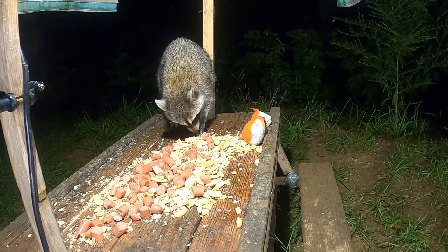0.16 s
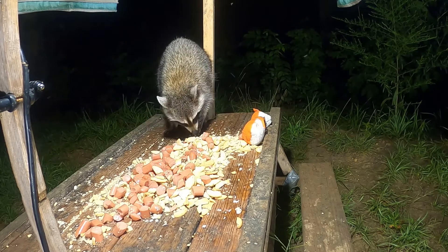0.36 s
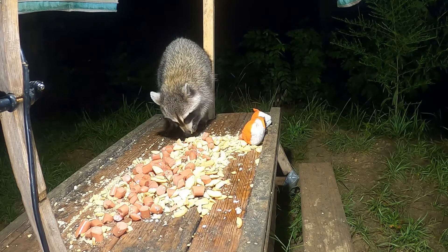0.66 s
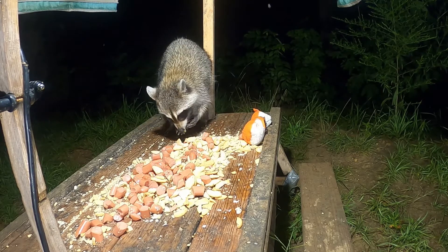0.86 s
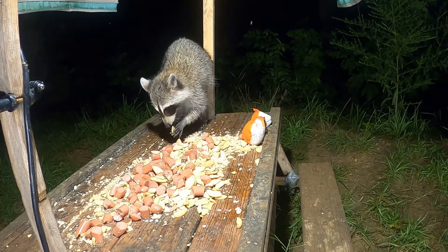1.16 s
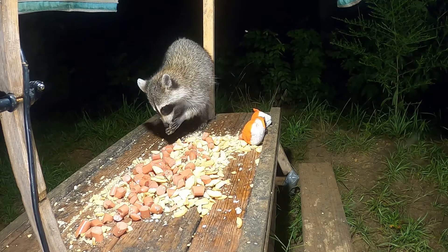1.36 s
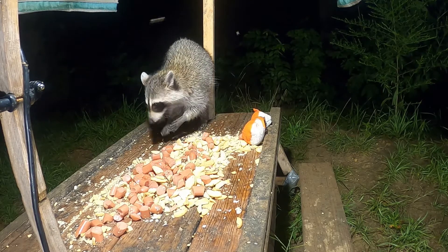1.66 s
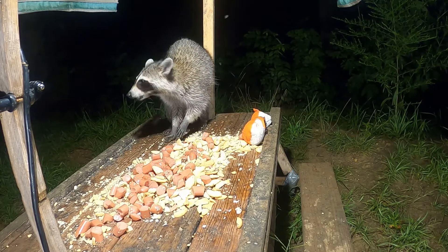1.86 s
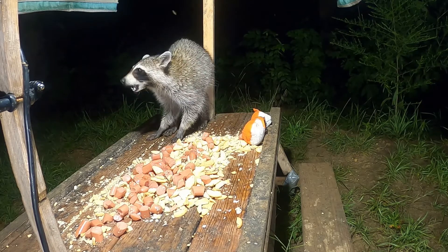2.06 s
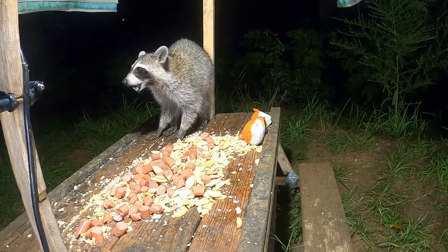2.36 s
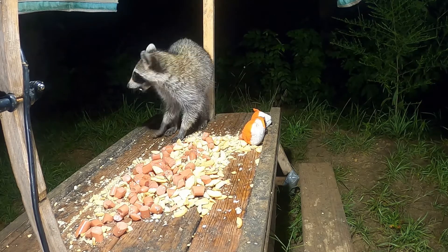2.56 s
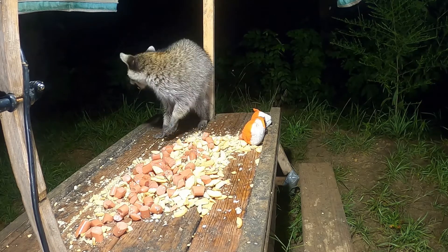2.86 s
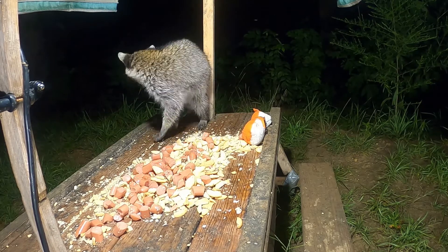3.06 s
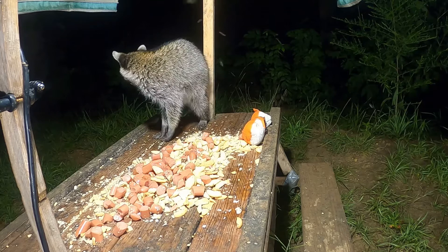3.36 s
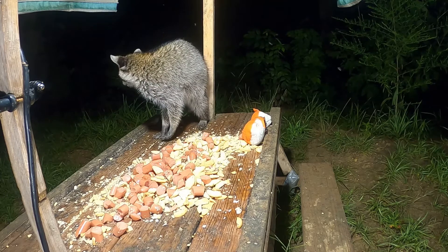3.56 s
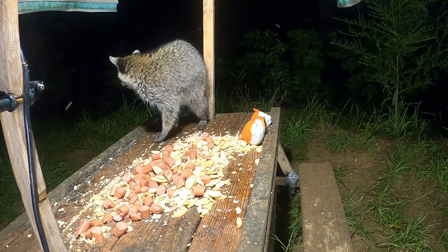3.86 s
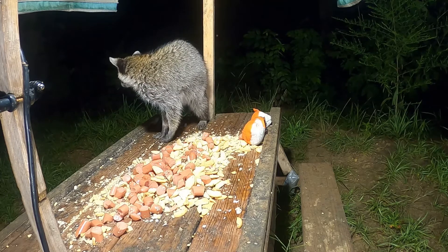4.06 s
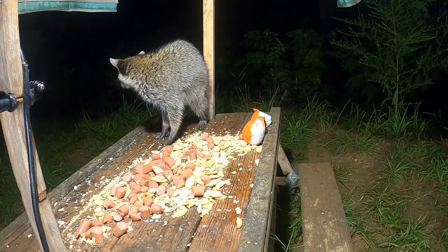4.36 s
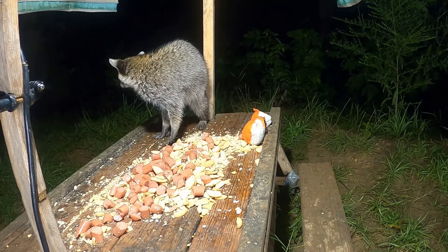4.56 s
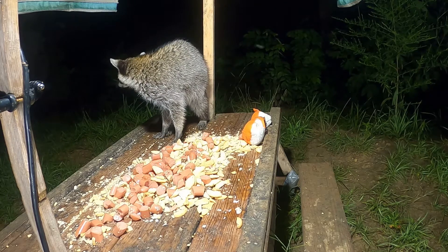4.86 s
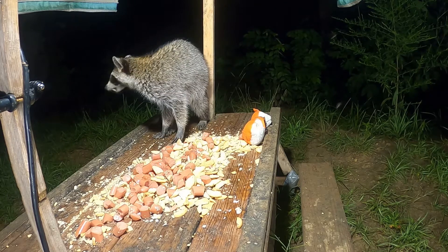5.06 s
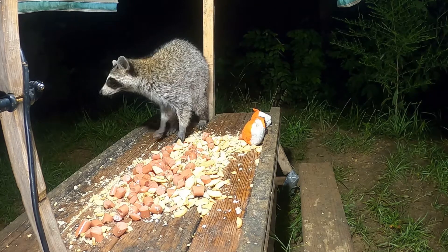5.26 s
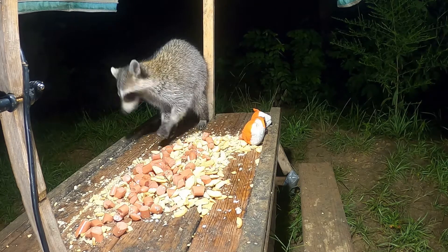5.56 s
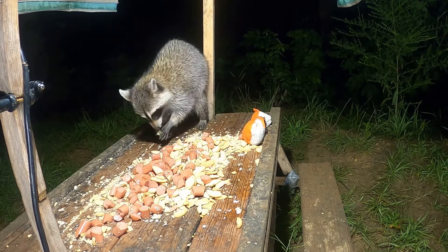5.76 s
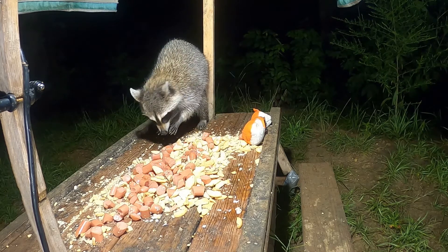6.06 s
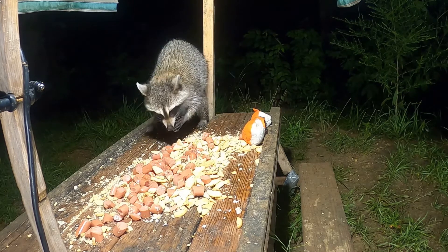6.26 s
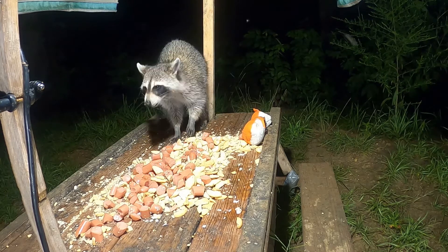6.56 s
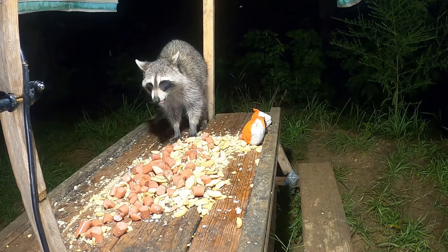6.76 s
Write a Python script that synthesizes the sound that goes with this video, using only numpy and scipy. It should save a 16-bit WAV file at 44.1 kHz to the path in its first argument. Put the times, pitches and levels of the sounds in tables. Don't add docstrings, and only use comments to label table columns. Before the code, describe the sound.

A dense shrill of crickets and rasping katydids fills the summer night while a feeding animal makes faint ticks, knocks and low thuds on boards.

```python
import sys
import numpy as np
from scipy import signal
from scipy.fft import rfft, irfft, next_fast_len
from scipy.io import wavfile
from scipy.ndimage import uniform_filter1d

SR = 44100
rng = np.random.default_rng(int(sys.argv[2]) if len(sys.argv) > 2 else 0)


def gain_from_decibels(decibels):
    exponent = np.asarray(decibels, float) / 20
    return 10 ** exponent


def transcribe(signal):
    frames = np.atleast_2d(signal).T
    limited = np.clip(frames, -1, 1)
    pcm = np.round(limited * 32767).astype(np.int16)
    wavfile.write(sys.argv[1], SR, pcm)


N = 304731


def rms_one(x):
    return x / np.sqrt(np.mean(x ** 2) + 1e-20)


def in_time(rows, axis=1):
    columns = np.transpose(rows)
    return np.interp(np.arange(N) / SR, columns[0], columns[axis])


def drift(rate_hz):
    r = np.exp(-80 * np.pi * rate_hz / SR)
    chance = rng.standard_normal(N // 40 + 2002)
    slow = signal.lfilter([1], [1, -2 * r, r * r], chance)[2000:]
    return np.interp(np.arange(N) / 40, np.arange(len(slow)), rms_one(slow))


def resonance(x, hz, width_hz):
    r = np.exp(-np.pi * width_hz / SR)
    zeros = np.array([1, 0, -1]) * (1 - r * r) / 2
    poles = [1, -2 * r * np.cos(2 * np.pi * hz / SR), r * r]
    return signal.lfilter(zeros, poles, x)


def double_resonance(x, hz, width_hz):
    return resonance(resonance(x, hz, width_hz), hz, width_hz)


def sides(pan_db):
    return gain_from_decibels(np.array([[.5], [-.5]]) * pan_db)


def coloured(x, hz, level_db):
    size = next_fast_len(N)
    bins_hz = np.maximum(np.arange(size // 2 + 1) * SR / size, 1)
    gain = gain_from_decibels(np.interp(np.log(bins_hz), np.log(hz), level_db))
    return irfft(rfft(x, size) * gain, size)[..., :N]


def teeth(per_s, spread_db, likeness, lag_s):
    clicks = (rng.random((3, N)) < per_s / SR) * rng.choice([-1, 1], (3, N))
    strength_db = spread_db * np.minimum(rng.exponential(1, (3, N)), 4)
    direct, *scattered = clicks * gain_from_decibels(strength_db)
    late = np.interp(np.arange(N) - lag_s * SR, np.arange(N), direct)
    alike = np.clip(likeness, 0, 1)
    return np.sqrt(alike) * np.array([late, direct]) + np.sqrt(1 - alike) * np.array(scattered)


def strokes_gain(rows, bed_db):
    t, power = np.arange(N) / SR, np.full(N, gain_from_decibels(2 * bed_db))
    for middle_s, level_db, length_s in rows:
        near = np.abs(t - middle_s) < length_s / 2
        power[near] += gain_from_decibels(2 * level_db) * np.cos(np.pi * (t[near] - middle_s) / length_s) ** 2
    return np.sqrt(power)


def night_air():
    # hz, level_db, left_right_db, likeness (0-1)
    air = [(20, -4.5, -7, 0.9), (90, -7, -.4, 0.34), (119, -7.5, -4, 0.5), (160, 3, -3, 0.19),
           (221, -0.5, -3.0, 0.48), (346, -9, -6.5, 0.17), (600, -15, -8.5, 0.15),
           (1000, -18, -14.5, 0.061), (3000, -16, -19.5, .1), (7600, -14, -2, .02), (8800, -24, 6, .02),
           (12200, -18.5, -4, .02), (13900, -21, -4, .02), (16000, -27.5, -4.1, .02)]
    hz, level_db, pan_db, likeness = np.transpose(air)
    shared, left, right = rng.standard_normal((3, N))
    alike = np.clip(likeness, 1e-3, .999)
    shared_db = level_db + 10 * np.log10(alike)
    own_db = level_db + 10 * np.log10(1 - alike)
    ears = []
    for own, side in ((left, .5), (right, -.5)):
        ears.append(coloured(shared, hz, shared_db + side * pan_db) + coloured(own, hz, own_db + side * pan_db))
    return gain_from_decibels(-62.5) * rms_one(np.array(ears))


def wind():
    # hz, level_db (per Hz)
    wind_spectrum = [(12, -30), (20, -3), (38, 1.5), (81, -1), (130, -3), (170, -37), (290, -120)]
    # time_s, level_db
    gusts = [
        (0, -78.5),
        (1.0, -74.5),
        (1.42, -83),
        (2.13, -80),
        (3.9, -80.5),
        (4.79, -70.5),
        (5.27, -88),
        (6.14, -69.5),
        (6.43, -75.5),
        (6.91, -69),
    ]
    shared, left, right = coloured(rng.standard_normal((3, N)), *np.transpose(wind_spectrum))
    ports = shared + 0.38 * np.array([left, right])
    evened = ports / np.sqrt(uniform_filter1d(np.mean(ports ** 2, axis=0), size=9000))
    return evened * gain_from_decibels(in_time(gusts) + 1.6 * drift(13))


def far_chorus():
    # hz, level_db (per Hz)
    far_shrill = [(900, -26.5), (1500, -19), (2000, -16.5), (2700, 1), (3500, -18), (4300, -4.5),
                  (5300, -3), (6250, -2), (6900, -20.5), (7800, -39)]
    blur = coloured(teeth(9000, 2.3, 0.089, lag_s=4e-5), *np.transpose(far_shrill))
    return rms_one(blur) * sides(0.23) * gain_from_decibels(-48.5 + 0.28 * drift(3.4))


def crickets():
    # wing_hz, width_hz, level_db, left_right_db, likeness (0-1)
    choirs = [
        (2167, 108, -49.5, 5, 0.83),
        (2272, 183, -50, 7.5, 0.69),
        (2400, 87, -48, 4, 0.63),
        (2936, 124, -50.5, 4, 0.5),
        (3069, 58, -55.5, 4, 0.57),
    ]
    out = 0
    for hz, width_hz, level_db, pan_db, likeness in choirs:
        strokes = teeth(2500, 2.1, likeness, lag_s=3e-5)
        harp = double_resonance(strokes, hz, 1.69 * width_hz)
        swell_db = 0.34 * drift(1.24) + .5 * drift(29)
        out = out + rms_one(harp) * sides(pan_db) * gain_from_decibels(level_db + swell_db)
    return out


def tree_katydids():
    # hz, width_hz, level_db
    rasp_wing = [(1290, 268, -16), (1900, 240, -0.5), (2690, 488, -1), (3280, 630, -5.5), (4090, 600, -1),
                 (4710, 863, -5.5)]
    # middle_s, level_db, length_s
    rasps = [(.06, -50.5, 0.24), (.25, -50.5, 0.22), (.39, -52, 0.24), (.56, -51, 0.27), (.99, -50.5, 0.24),
             (1.21, -49.5, 0.29), (1.44, -53.5, 0.41), (1.72, -51.5, 0.22), (1.891, -53, .2),
             (2.16, -54, 0.23), (2.349, -51, 0.23), (2.59, -50.5, .24), (2.781, -49, 0.23),
             (2.93, -53, 0.17), (3.14, -56, 0.28), (3.33, -52, 0.21), (3.649, -52, .3), (3.84, -52, .16),
             (4.06, -52, .24), (4.26, -53.5, 0.26), (4.62, -52, 0.44), (4.809, -50, 0.27),
             (4.98, -53.5, 0.26), (5.28, -57, .4), (5.6, -51.5, 0.23), (5.78, -50, 0.3), (5.95, -52.5, 0.3),
             (6.36, -54, 0.44), (6.63, -53, 0.23), (6.8, -50.5, 0.27)]
    scrape = teeth(5000, 2.84, 0.59, lag_s=3e-5)
    wings = 0
    for k, (hz, width_hz, level_db) in enumerate(rasp_wing):
        polarity = (-1) ** k
        wings = wings + polarity * gain_from_decibels(level_db) * double_resonance(scrape, hz, 2.03 * width_hz)
    farther_bed_db = -59
    return rms_one(wings) * sides(3.8) * gain_from_decibels(5.5) * strokes_gain(rasps, farther_bed_db)


def phrases_gain():
    # start_s, end_s, level_db, swell_s, fade_s
    phrases = [
        (.36, 1.85, -65.5, 0.19, 0.17),
        (2.49, 4.4, -65.5, 0.22, .34),
        (4.82, 6.56, -65, 0.2, .2),
    ]
    # middle_s, level_db
    buzz_ticks = [
        (2.281, -71),
        (4.479, -75),
        (6.55, -69),
        (6.68, -72),
    ]
    t, held = np.arange(N) / SR, 0
    for start_s, end_s, level_db, swell_s, fade_s in phrases:
        corners_s = [start_s, start_s + swell_s, end_s - fade_s, end_s]
        held = held + gain_from_decibels(level_db) * np.interp(t, corners_s, [0, 1, 1, 0]) ** 1.4
    tick_s = 0.044
    return np.hypot(held, strokes_gain([(*row, tick_s) for row in buzz_ticks], bed_db=-80.5))


def meadow_katydids():
    # hz, width_hz, left_db, right_db
    buzz_wing = [(8650, 1750, -4, -1), (10070, 1800, -0.5, 1.5), (12200, 2300, -15, -4.5),
                 (13500, 2300, -19, -16)]
    # middle_s, level_db, length_s
    rustles = [
        (.56, -63, .45),
        (1.46, -66.5, .2),
        (2.75, -72, 0.43),
        (3.59, -65, 0.33),
        (5.6, -70, .8),
        (6.15, -66.5, 0.42),
    ]
    file = teeth(6000, 2.8, 0.033, lag_s=1e-4)
    buzz = 0
    for k, (hz, width_hz, left_db, right_db) in enumerate(buzz_wing):
        buzz = buzz + (-1) ** k * gain_from_decibels([[left_db], [right_db]]) * double_resonance(file, hz, width_hz)
    rustle = double_resonance(teeth(4000, 3.7, 0.12, lag_s=1e-4), 7730, 1300)
    buzzing = rms_one(buzz) * phrases_gain() * gain_from_decibels(0.5 + 0.54 * drift(19.0))
    rustling = rms_one(rustle) * sides(-7.0) * gain_from_decibels(-4.5) * strokes_gain(rustles, bed_db=-70)
    return buzzing + rustling


def solo_cricket():
    # middle_s, level_db, pitch_hz
    chirps = [(.04, -59, 1930), (.34, -45.5, 1898), (.55, -50, 1890), (.99, -52, 1924), (1.16, -46, 1940),
              (1.28, -47, 1897), (1.719, -50, 1900), (1.87, -55, 1964), (2.12, -49.5, 1950),
              (2.32, -48, 1870), (2.47, -49, 1910), (2.609, -52, 1910), (2.74, -45.5, 1905),
              (2.94, -51, 1900), (3.13, -50, 1900), (3.31, -49.5, 1903), (3.63, -54.5, 1936),
              (3.85, -47, 1900), (4.03, -52.5, 1900), (4.21, -47, 1880), (4.58, -49, 1906),
              (4.77, -48, 1900), (4.95, -46, 1880), (5.5, -49, 1900), (5.71, -47, 1900), (5.91, -49, 1856),
              (6.21, -50, 1880), (6.37, -44.5, 1947), (6.57, -48, 1890), (6.72, -51, 1910)]
    r = np.exp(-2 * np.pi * 40 / SR)
    strikes = teeth(1400, 1.7, 0.92, lag_s=4e-5) + 1j * teeth(1500, 1.1, 0.72, lag_s=4e-5)
    wander = signal.lfilter([1], [1, -2 * r, r * r], strikes)
    phase = 2 * np.pi * np.cumsum(in_time(chirps, axis=2)) / SR
    tone = np.real(wander * np.exp(1j * phase))
    chirp_s = .13
    strokes = [(middle_s, level_db, chirp_s) for middle_s, level_db, _ in chirps]
    return rms_one(tone) * sides(9.0) * gain_from_decibels(-5.5) * strokes_gain(strokes, bed_db=-62)


def contacts(rows, rise_s, partners):
    out, t = np.zeros((2, N + SR)), np.arange(SR // 5) / SR
    for start_s, peak_db, hz, pan_db, t60_s, grit_share in rows:
        shape = (1 - np.exp(-t / rise_s)) ** 2 * gain_from_decibels(-60 * t / t60_s)
        tone = np.sin(2 * np.pi * hz * t)
        for ratio, partner_db in partners:
            tone = tone + gain_from_decibels(partner_db) * np.sin(2 * np.pi * ratio * hz * t)
        grit = rms_one(double_resonance(rng.standard_normal(len(t)), hz, 1.25 * hz))
        share = np.clip(grit_share, 0, 1)
        hit = shape / shape.max() * ((1 - share) * tone + share * grit)
        at = round((start_s - rise_s) * SR)
        out[:, at:at + len(t)] += gain_from_decibels(peak_db) * sides(pan_db) * hit
    return out[:, :N]


def raccoon():
    # start_s, peak_db, board_hz, t60_s, grit_share (0-1)
    knock_rows = [(1.996, -55.5, 160, .11, .2), (2.0, -56.5, 780, .04, 0.49), (2.027, -55, 785, 0.17, 0.71),
                  (2.273, -51.5, 1091, .07, 0.51), (2.298, -63, 600, .04, .9), (2.407, -62, 898, .06, 0.78),
                  (2.762, -62, 895, 0.045, .8), (3.031, -59, 840, .091, .69), (3.273, -63, 490, 0.054, 0.8),
                  (5.447, -56, 263, 0.044, .24), (5.645, -66.5, 750, .087, .9),
                  (5.715, -62, 748, .043, .84), (6.1, -64, 450, .04, 0.64), (6.214, -53, 364, 0.034, 0.3),
                  (6.68, -53.5, 817, .065, 0.34), (6.706, -62, 664, .06, 0.23)]
    # start_s, peak_db, pitch_hz, left_right_db
    tick_rows = [
        (.0882, -54.5, 1284, -2),
        (.3232, -53, 1500, .5),
        (0.715, -50.5, 1665, 0),
        (.851, -46.5, 1734, -4),
        (1.5743, -48.5, 1524, -3),
        (1.719, -45.5, 1480, -.5),
        (1.9215, -52.5, 1500, 2),
        (5.9294, -58, 1440, 5),
        (6.0992, -51, 1510, -4),
        (6.379, -51, 1412, 3.5),
    ]
    # start_s, peak_db, frame_hz
    thud_rows = [(.59, -61, 74.5), (.79, -59, 70), (.98, -62, 44.9), (1.11, -60, 58), (1.73, -62, 54.6),
                 (1.89, -65, 50), (2.291, -60.5, 55), (2.79, -65, 38), (3.561, -63, 40), (3.9, -64, 60),
                 (4.03, -63, 55.23), (4.63, -62, 62), (4.7, -62, 74.8), (4.764, -63, 62), (4.87, -63, 48),
                 (4.94, -58.5, 90), (5.034, -56, 52), (5.295, -55, 32), (5.615, -57, 38), (5.815, -64, 62),
                 (5.9, -60, 54.6), (5.956, -53.5, 86), (6.095, -58.5, 29.8), (6.106, -59.5, 83.7),
                 (6.261, -56, 85), (6.305, -56, 32), (6.63, -53.5, 80.4), (6.74, -59, 32)]
    knock_pan_db = -3.5
    tick_t60_s, tick_grit = 0.039, 0.18
    thud_pan_db, thud_t60_s, thud_grit = 2, 0.13, 0.23
    knocks = [(s, db, hz, knock_pan_db, t60_s, grit) for s, db, hz, t60_s, grit in knock_rows]
    ticks = [(*row, tick_t60_s, tick_grit) for row in tick_rows]
    thuds = [(*row, thud_pan_db, thud_t60_s, thud_grit) for row in thud_rows]
    # (frequency ratio, dB)
    return (contacts(knocks, rise_s=0.00472, partners=[(1.33, -6), (.68, -11.5)])
            + contacts(ticks, rise_s=0.0069, partners=[(.93, -7)])
            + contacts(thuds, rise_s=0.01796, partners=[(1.6, -11)]))


def scene():
    insects = far_chorus() + crickets() + tree_katydids() + meadow_katydids() + solo_cricket()
    return night_air() + wind() + insects + raccoon()


def gated(x):
    # hz, threshold_db (against the local level)
    gate = [(100, -11), (300, -7), (900, -3.5), (1500, -6.5), (2300, -10.5), (5000, -5.5), (7000, -7),
            (10000, -5), (11500, -2.5), (13500, -1.5), (15700, -6)]
    lead = 902
    hz, _, frames = signal.stft(np.pad(x, ((0, 0), (lead, 0))), SR, "cosine", nperseg=2048)
    knots_hz, threshold_db = np.transpose(gate)
    band, count = np.arange(len(hz)) // 8, frames.shape[-1]
    power = np.abs(frames) ** 2 + 1e-30
    local = uniform_filter1d(uniform_filter1d(power, size=9, axis=1), size=5, axis=2)
    waver_db = 3.57 * (rng.exponential(1, (2, band[-1] + 1, count))[:, band] - 1)
    starved = rms_one(signal.lfilter([1], [1, -.55], rng.standard_normal(count)))
    waver_db = waver_db + 1.8 * starved * np.clip(hz[:, None] / 9000, 0, 1.4)
    threshold = gain_from_decibels(2 * (np.interp(hz, knots_hz, threshold_db)[:, None] + waver_db))
    passed = 1 / (1 + (threshold * local / power) ** 6.0)
    kept = uniform_filter1d(power * passed ** 2, size=33, axis=1) / uniform_filter1d(power, size=33, axis=1)
    passed = passed * (kept + 0.048) ** -.3
    ceiling_hz = 15150 - 420 * starved
    over = (hz[:, None] + 60 * waver_db - ceiling_hz) / 40
    under = 1 / (1 + np.exp(np.clip(over, -50, 50)))
    return signal.istft(frames * passed * under, SR, "cosine", nperseg=2048)[1][:, lead:lead + N]


def roll_off(x):
    return signal.sosfilt(signal.butter(12, 15710, fs=SR, output="sos"), x)


def record(dry):
    mix = gated(dry)
    return roll_off(mix)


dry = scene()
out = record(dry)
transcribe(out)
```